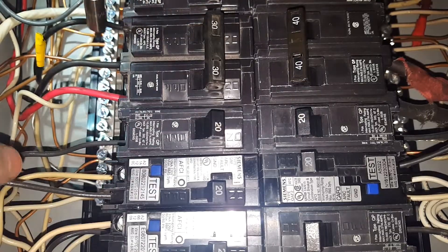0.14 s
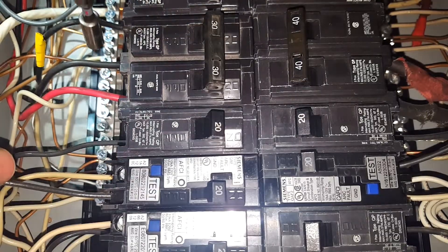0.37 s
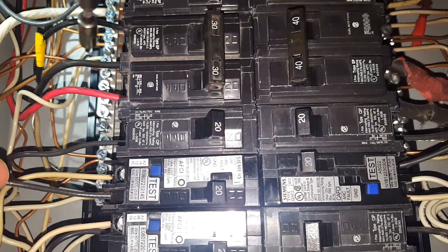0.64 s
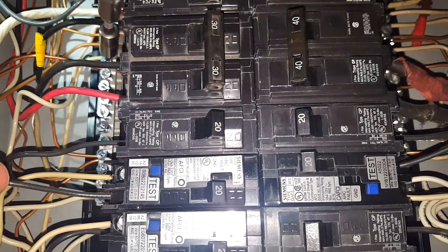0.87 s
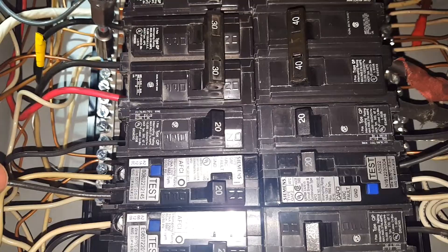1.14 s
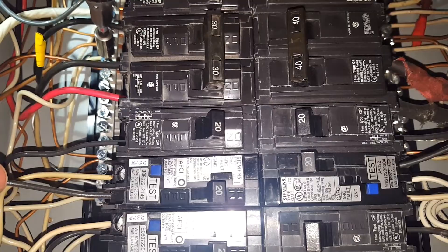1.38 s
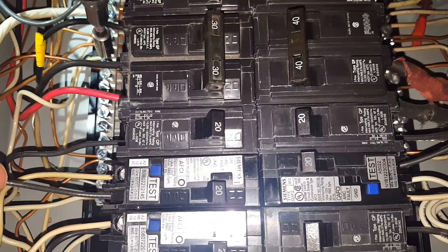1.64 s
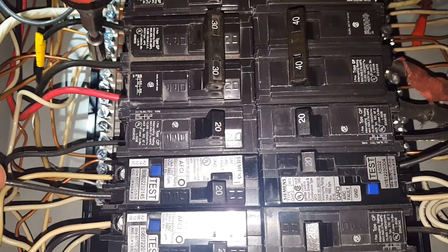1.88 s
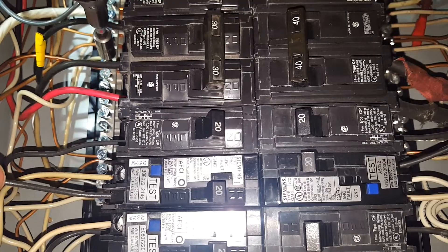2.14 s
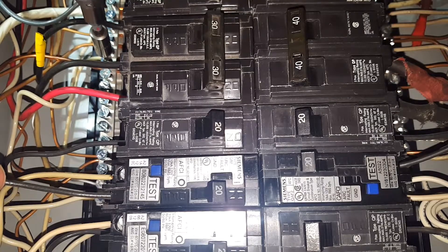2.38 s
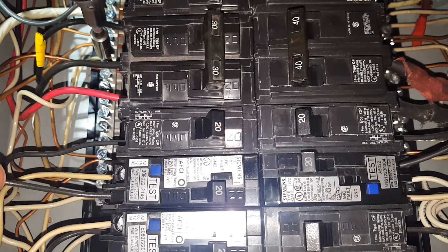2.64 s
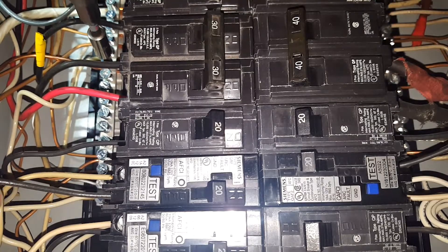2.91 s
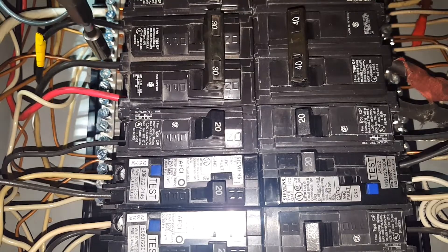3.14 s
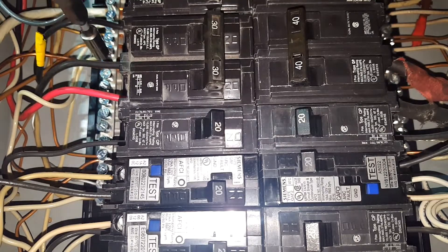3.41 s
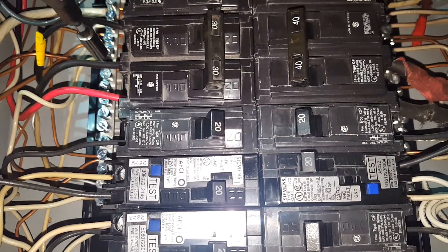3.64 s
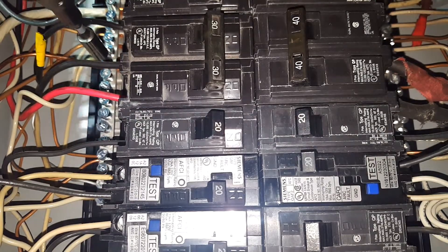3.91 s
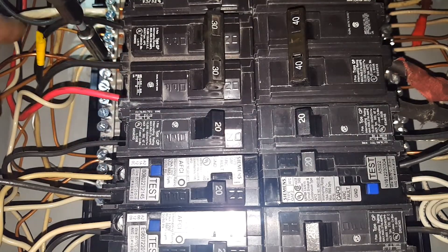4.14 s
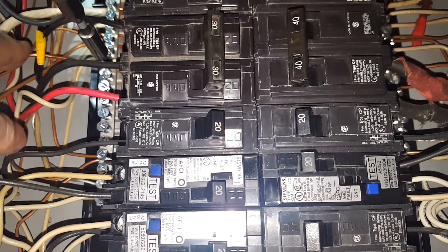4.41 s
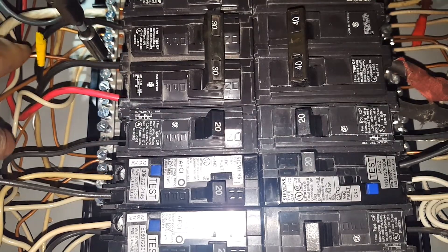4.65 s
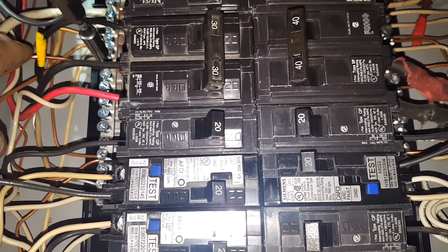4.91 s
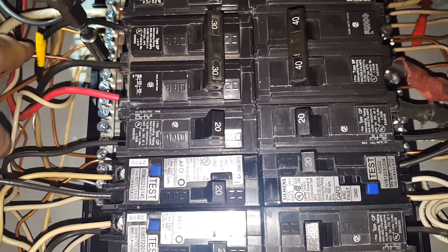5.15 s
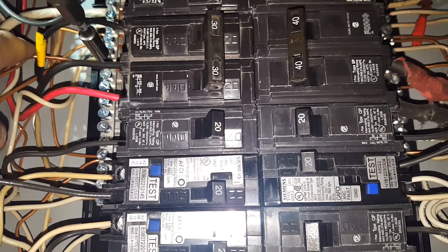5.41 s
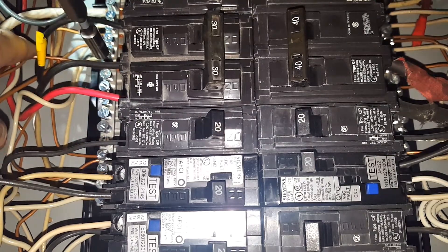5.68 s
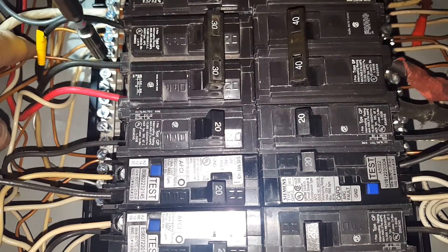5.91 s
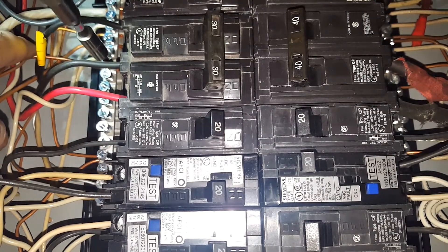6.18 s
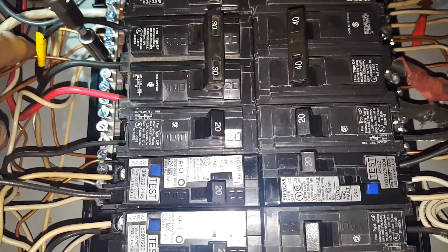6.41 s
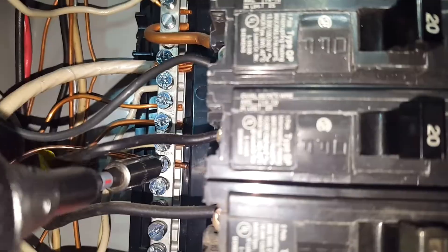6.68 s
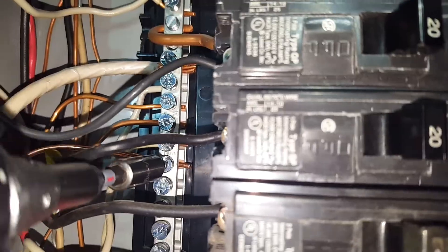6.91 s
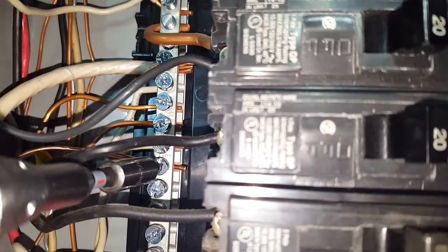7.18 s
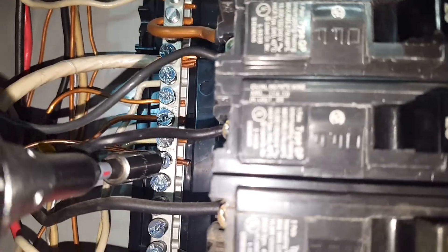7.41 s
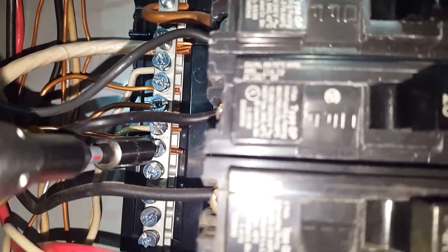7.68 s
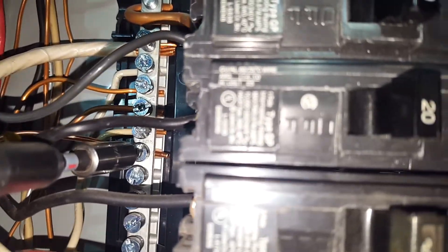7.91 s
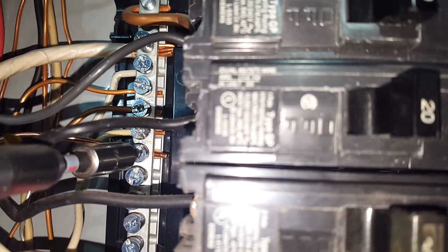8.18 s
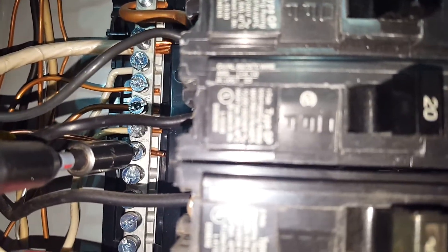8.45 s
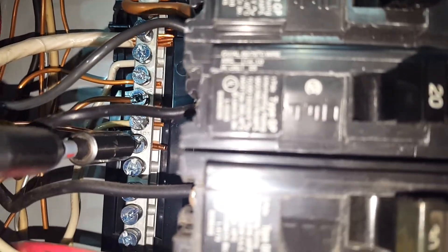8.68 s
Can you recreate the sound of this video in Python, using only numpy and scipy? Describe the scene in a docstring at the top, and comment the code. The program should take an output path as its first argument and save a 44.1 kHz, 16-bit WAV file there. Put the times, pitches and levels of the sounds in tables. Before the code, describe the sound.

A quiet indoor room with faint low hum and airy noise, heard very close by a hand-held phone. From 0 s a screwdriver rubs softly in a screw slot, with sparse dull taps from about 0.2 s that ring briefly in the steel box. Soft low bumps touch the left side around 1.0-1.2 s. Firmer knocks come near 2.0 and 2.5 s; low thumps cluster at 2.6-3.3 s, strongest near 3.1. Small hissing skids appear around 3.6 s. From 5 to 6.7 s taps, scrapes and thin slides crowd together irregularly, ending in a coarse scrape at 6.7. The work drops out for under a tenth of a second, then four fast, bright paired ratchet clicks snap at 6.85-6.95 s, left-heavy. A small tap follows near 7.1, a clear knock at 7.6, then faint rubbing and weak contacts near 8.6 over the quiet room.

```python
"""A screwdriver works the terminal screws of a steel electrical panel, close to a hand-held phone.
From the start a quiet room hums and the blade works: shaped noise whose rubbing follows the effort, while
skids, ticks and hiss strokes come at their own times. Soon the tip taps: noise bursts with box, bar and shaft modes.
From 1 s low thumps hit the left port only. Near 6.7 s the working sounds are muted for a moment; then a ratchet
clicks in pairs, each click opening with a snap. Light rubbing and a few sparse contacts remain over the room."""
import sys
import numpy as np
from scipy import signal
from scipy.fft import rfft, irfft, next_fast_len
from scipy.io import wavfile
from scipy.ndimage import uniform_filter1d, map_coordinates

SR = 44100
rng = np.random.default_rng(int(sys.argv[2]) if len(sys.argv) > 2 else 0)


def wrap_up_sound(samples):
    """Save the sound to the file named by the first command line argument, as 16-bit audio."""
    columns = np.atleast_2d(samples).T
    # keep every value between -1 and 1, then stretch to whole-number steps
    tamed = np.clip(columns, -1, 1)
    steps = np.round(tamed * 32767).astype(np.int16)
    wavfile.write(sys.argv[1], SR, steps)


def invert_db(level):
    """Linear amplitude ratio for a level in decibels (20 dB per decade), elementwise."""
    return 10 ** (np.asarray(level, dtype=float) / 20)


N = 388521


def unit(x):
    """Scaled to rms 1."""
    return x / np.sqrt(np.mean(x ** 2) + 1e-20)


def along(points, hz):
    """Interpolates (Hz, value) points on a log frequency axis."""
    point_hz, value = np.transpose(points)
    return np.interp(np.log(hz + 1), np.log(point_hz + 1), value, left=value[0], right=value[-1])


def wobble(knots_per_s):
    """A smooth random curve through normal draws."""
    knots = rng.standard_normal(int(N * knots_per_s / SR) + 4)
    return map_coordinates(knots, [np.arange(N) * knots_per_s / SR])


def swells(rows):
    """A bell-shaped gain for each (centre s, dB, half length s) row, summed."""
    t = np.arange(N) / SR
    return sum(invert_db(db) * np.exp(-((t - s) / half_s) ** 2) for s, db, half_s in rows)


# Default stereo spread. Each row: frequency in Hz, left-right likeness 0 to 1.
ALIKE = [(60, 0.35), (130, 0.93), (290, 0.3), (640, .15), (1400, 0.041), (15000, .01)]


def rush(spectrum, grit_db=0, alike=ALIKE):
    """Stereo noise of rms 1, by default most alike in the bass; random gain of grit_db makes it grainy."""
    size = next_fast_len(N)
    hz = np.fft.rfftfreq(size, 1 / SR)
    pair = rng.standard_normal((2, N)) * invert_db(grit_db * wobble(180))
    turn = np.arccos(np.clip(along(alike, hz), 0, 1)) / 2
    inside = (hz >= spectrum[0][0] / 2) & (hz <= spectrum[-1][0] * 2)
    shape = inside * invert_db(along(spectrum, hz)) * [np.cos(turn), np.sin(turn)]
    mid, side = irfft(rfft(pair, size) * shape, size)[:, :N]
    return unit(np.array([mid + side, mid - side]))


# Air noise of the room. Each row: frequency in Hz, relative density in dB per Hz.
ROOM = [(12, -36.5), (20, -5.5), (27, -15.5), (96, -6), (121, -11.5), (206, -12.5), (393, -25.5),
        (1140, -31.5), (1320, -29), (1430, -26.5), (9950, -41.5), (13900, -37.5), (16500, -37.5)]
# Steady tones in the room. Each row: frequency in Hz, level in dB before the port balance.
HUM = [(91.5, -84), (204.6, -81), (1362, -89)]


def room():
    """Faint shaped air noise and a few wavering tones, stronger at the left port."""
    t = np.arange(N) / SR
    tones = sum(invert_db(db + 3 + 1.5 * wobble(4.2)) * np.sin(2 * np.pi * hz * t) for hz, db in HUM)
    air = invert_db(-64.5 + 0.48 * wobble(19)) * rush(ROOM)
    return (air + tones) * invert_db([[1.4], [-1.4]])


def ticks(count, t60_s):
    """Envelope of tiny catches of the blade: random times, a few large among many small."""
    when, size = rng.random((2, count))
    spikes = np.bincount((when * N).astype(int), invert_db(-9 * np.log(1 - size) / 2), N)
    decay = invert_db(-60 * np.arange(SR // 10) / SR / t60_s)
    return signal.fftconvolve(spikes, decay)[:N]


# Turning under pressure. Each row: time in seconds, effort as box rumble in dB.
TURN = [(0.0, -60.5), (0.22, -64), (0.78, -66), (1.2, -72.5), (1.44, -62), (1.7, -59.5), (2.11, -57),
        (2.35, -70), (2.53, -53.5), (2.9, -54.5), (3.21, -49.5), (3.51, -60.5), (3.9, -48.5), (4.55, -58.5),
        (5.05, -49), (5.69, -51), (5.86, -46), (6.5, -51.5), (6.7, -44), (6.8, -51.5), (6.89, -59),
        (7.09, -56.5), (7.25, -79), (7.75, -73.5), (8.14, -76.5), (8.81, -73.5)]
# Strokes of the blade sliding on steel. Each row: centre in seconds, hiss level in dB, half length in seconds.
SLIDE = [(0.2, -73, 0.074), (0.68, -73, 0.063), (1.93, -70, 0.0075), (1.99, -64, 0.046),
         (2.485, -63, 0.012), (2.58, -84, 0.029), (2.82, -85, 0.03), (3.25, -67, 0.18), (3.54, -65, 0.032),
         (3.62, -62, 0.038), (3.7, -56, 0.024), (3.93, -64, 0.042), (4.13, -63, 0.02), (4.3, -63.5, 0.029),
         (4.88, -70, 0.019), (5.07, -66.5, 0.062), (5.19, -62, 0.03), (5.39, -64.5, 0.078),
         (5.58, -66.5, 0.058), (5.74, -60, 0.049), (5.89, -64, 0.042), (6.02, -60, 0.078),
         (6.24, -59.5, 0.028), (6.325, -48, 0.0063), (6.41, -57, 0.038), (6.57, -50, 0.011),
         (6.685, -54, 0.032), (6.81, -55, 0.025), (6.865, -51, 0.014), (6.93, -51.5, 0.013),
         (6.975, -55, 0.045)]
# Spectra of the rubbing. Each row: frequency in Hz, relative density in dB per Hz.
RUMBLE = [(80, -35.5), (160, -1.5), (290, 1.5), (400, -3.5), (510, 1.5), (690, -8.5), (835, -4.5),
          (1000, -5), (1600, -11.5), (2500, -43)]
SCRAPE = [(500, -20), (900, -3), (1300, -3), (1800, -3), (3000, -9), (4500, -13), (7000, -30)]
HISS = [(3000, -19), (5000, 0), (8500, 0.5), (10500, -8), (13500, 1), (16000, -15.5)]
# A contact reaches both ports. Each row: frequency in Hz, left-right likeness 0 to 1.
NEAR = [(100, 0.67), (300, .9), (1000, 0.6), (4000, 0.73), (15000, 0.11)]


def turning():
    """The blade rubs in the slot: with effort the box rumbles, the steel scrapes and hisses; strokes add hiss."""
    time_s, effort = np.transpose(TURN)
    effort_db = np.interp(np.arange(N) / SR, time_s, effort)
    scrape_db = effort_db - 14
    slips, left = wobble(22), np.array([[1], [-1]])
    rumble = invert_db(effort_db + 3.1 * slips + 3.2 * left) * rush(RUMBLE, grit_db=1.5)
    # the blade only catches when it is pressed hard
    pressed = np.clip((scrape_db + 69) / 9, 0, 1)
    grain = 1 + 0.4 * pressed * ticks(count=600, t60_s=0.02)
    scrape = invert_db(scrape_db + 1.1 * slips + 1.1 * left) * grain * rush(SCRAPE, grit_db=3.0, alike=NEAR)
    # steady hiss grows 0.55 dB per dB of effort
    sliding = invert_db(-73.5 + 0.55 * (effort_db + 52.5)) + swells(SLIDE)
    hiss = sliding * invert_db(1.2 * slips + 2.4 * left) * rush(HISS, grit_db=3.0)
    return rumble + scrape + hiss


# Short skids and tiny broad ticks of the blade.
# Each row: centre in seconds, level in dB, pitch in Hz, resonance half width in Hz, half length in seconds.
SKIDS = [(0.176, -72, 8300, 1820, 0.072), (.67, -70, 4230, 700, 0.11), (3.149, -63.5, 6200, 2500, 0.078),
         (3.531, -49, 8100, 1800, 0.014), (3.607, -44.5, 8500, 1180, 0.0085),
         (6.692, -30.5, 1340, 880, 0.038), (7.008, -54, 12000, 3970, 0.0018),
         (7.042, -51.5, 9050, 5000, 0.0017), (7.151, -69.5, 4490, 2500, .002),
         (2.536, -56, 4940, 1800, .003), (6.789, -45, 7000, 7000, 0.0018), (6.826, -52, 7500, 2500, 0.0018),
         (5.463, -70, 4400, 60, 0.021)]


def skids_and_ticks():
    """Each skid or tick is a swell of noise in one resonance, narrow or broad, stronger at the left port."""
    half = SR // 8
    t, f = np.arange(-half, half) / SR, np.fft.rfftfreq(half * 2, 1 / SR)
    out = np.zeros((2, N))
    for s, db, hz, width_hz, half_s in SKIDS:
        resonance = 1 / (1 + ((f - hz) / width_hz) ** 2)
        noise = unit(irfft(rfft(rng.standard_normal((2, len(t)))) * resonance))
        swell = np.exp(-(t / half_s) ** 2)
        out[:, round(s * SR) - half:][:, :len(t)] += invert_db(db + np.array([[3], [-3]])) * swell * noise
    return out


# Contact noise. Each row: band centre in Hz, level in dB, t60 in seconds at length factor 1.
BANDS = [(147, -4, 0.58), (256.8, 3, 0.33), (487, 1, 0.27), (1015, -7.5, 0.16), (1990, -3.5, 0.11),
         (3130, -10.5, 0.11), (4440, -1, 0.05), (7500, -2.5, 0.016), (12000, -8, 0.048)]
# Modes of the box and of the terminal bar. Each row: frequency in Hz, level in dB, t60 in seconds at length factor 1.
BOX = [(162, -4.5, 0.42), (266.4, -2, 0.1985), (498.2, 1, 0.25), (632, -5.5, 0.25), (836.6, -8, 0.2),
       (1153, -10.5, 0.096), (1534, -11.5, 0.056), (1945, -12.5, .06)]
BAR = [(2750, -12, .04), (3470, -14, .035), (4700, -14, .03), (5800, -14, .025), (8850, -17, .02)]
# The tool's shaft. Each row: multiple of its pitch, level in dB, t60 in seconds at length factor 1.
SHAFT = [(1.001, -8.5, 0.0704), (1.9, -6, .045), (2.76, -24.5, 0.03)]
# Answer of the small room. Each row: frequency in Hz, t60 in seconds.
ECHO = [(300, .35), (2000, 0.086), (10000, 0.088)]
LAG_SAMPLES = 28  # the treble of a contact reaches the right port this much later


def contacts(table, attack_s, crack_db, crack_t60_s, crack_cycles, ring_db, air_db, left_db, shade_db):
    """Each contact: a crack, noise dying band by band, and the box, bar and shaft modes ringing."""
    hz, level, t60_s = np.transpose(BANDS)
    noise = np.array([rush([(f / 2, -30), (f / 1.333, 0), (f * 1.254, 0), (f * 2, -30)], alike=NEAR) for f in hz])
    noise[hz > 1500, 1] = np.roll(noise[hz > 1500, 1], LAG_SAMPLES, axis=-1)
    noise = np.pad(noise, ((0, 0), (0, 0), (0, SR)))
    out, t = np.zeros((2, N + SR)), np.arange(SR // 4) / SR

    def side(f):
        """The phone's body shades the right port, more so in the treble."""
        return invert_db(np.multiply.outer([0.5, -0.5], left_db + shade_db * f / 10000))

    for s, db, knock_db, bright_db, pitch_hz, length in table:
        def tilt(f):
            """Tone of the contact in dB: the place struck favours the partials near its own pitch."""
            tone = [(450, knock_db), (800, 0.0036), (3000, 0), (5000, bright_db), (8000, bright_db),
                    (12000, bright_db + air_db)]
            return along(tone, f) + 7 * np.exp(-(np.log(f / pitch_hz) / 0.51) ** 2)

        modes = BOX + BAR + [(pitch_hz * ratio, shaft_db, shaft_t60) for ratio, shaft_db, shaft_t60 in SHAFT]
        mode_hz, mode_db, mode_t60_s = np.transpose(modes)[..., None]
        at = slice(round(s * SR), round(s * SR) + len(t))
        slow = np.clip(length, 0.1, 3)
        # the bass swells more slowly than the treble
        rise = 1 - np.exp(-t / (attack_s * slow + 1.2 / hz[:, None]))
        body = invert_db(-60 * t / (t60_s[:, None] * slow))
        crack = invert_db(crack_db - 60 * t / ((crack_t60_s + crack_cycles / hz[:, None]) * slow))
        echo = invert_db(-22.5 - 60 * t / along(ECHO, hz)[:, None])
        envelope = invert_db(level + tilt(hz))[:, None] * rise * (body + crack + echo)
        sound = np.einsum("cb,bt,bct->ct", side(hz), envelope, noise[:, :, at])
        # modes vary in level, pitch and phase from contact to contact
        draw = rng.standard_normal((3, 2, len(modes), 1))
        mode_level = ring_db + mode_db + tilt(mode_hz) + 1.9 * draw[0]
        strength = side(mode_hz) * invert_db(mode_level - 60 * t / (mode_t60_s * slow))
        phase = 3 * draw[1, 1] + 0.56 * draw[2]
        swing = np.sin(2 * np.pi * mode_hz * (1 + 0.025 * draw[1, 0]) * t + phase)
        sound += (strength * swing).sum(1) * (1 - np.exp(-t / 0.0012))
        out[:, at] += invert_db(db) * sound
    return out[:, :N]


# Tip contacts, before the common trim.
# Each row: start in seconds, level in dB, box knock in dB, brightness in dB, ring length factor.
TAPS = [(0.237, -51, -8.5, 7.5, 1.4), (0.416, -30.5, -5, -22.5, 1.12), (0.72, -38.5, -12, -19, 1.5),
        (0.787, -45, -3, -34, 1.26), (0.92, -50.5, 8.5, -38, 0.72), (1.111, -30.5, -6, -31, 0.86),
        (1.394, -37, -6.5, -55, 0.81), (1.435, -32.5, -3.5, -42, 1.08), (1.633, -45.5, -4, -65, 2.8),
        (1.755, -45, -8, -41, 0.67), (1.866, -51, -9, -1, 0.91), (1.92, -31.5, -14, -3.5, 2.44),
        (1.975, -19.5, -8.5, -10, 0.56), (1.999, -40, -5, 4, 3.4), (2.091, -38, -11.5, -4, 1.07),
        (2.274, -28.5, -3.5, -5, 1.09), (2.455, -37, 2, -26, 1.2), (2.475, -21, -6.5, -5.5, 0.91),
        (2.58, -34.5, -12.5, 1.5, 1.04), (2.71, -41.5, -19, -40, 1.3), (2.775, -36, -12.5, -12.5, 0.8),
        (2.811, -23, -6, -24, 0.8), (3.04, -36, -12.5, -18.5, 2.3), (3.069, -45, 9.5, -0.5, 1.1),
        (3.276, -35.5, 9.5, -34, 0.7), (3.304, -35.5, -8, -16, 1.3), (3.481, -27, -2, -71, 0.83),
        (3.542, -35, -33.5, -33, 1.7), (3.607, -43, -6, -15, 2.7), (3.656, -42, -20, -13, 1.3),
        (3.689, -31.5, -16.5, -17, 0.59), (3.697, -32.5, -23, -20, 1.03), (3.824, -36.5, -4.5, -38, 0.89),
        (3.839, -41.5, -31, -16, 1.8), (3.934, -42, -14, -37, 1.9), (3.973, -42.5, -11, -47, 1.3),
        (4.112, -49.5, -25, 7.5, 1.4), (4.138, -33.5, -17.5, -74, 1.1), (4.274, -42.5, -8.5, -17, 3),
        (4.491, -50, -31, -2, 0.97), (4.551, -42, -0.5, -13, 0.5), (4.643, -50.5, -16, 0, 1.5),
        (4.761, -37.5, -35, -33, 1), (4.858, -42.5, 1, -48, 1.13), (4.955, -37.5, -19.5, -35, 1.16),
        (4.984, -38.5, -5.5, -17, 3.2), (5.069, -33.5, -19, -15, 0.93), (5.08, -31.5, -7, -19, 0.56),
        (5.247, -33, -12, -13, 1.3), (5.299, -33, -24, -14, 0.81), (5.349, -30.5, -12, -7.5, 2.3),
        (5.379, -36.5, -15, -31, 1.4), (5.417, -35.5, -20.5, -21, 2), (5.442, -36.5, -18.5, -32, 1.9),
        (5.622, -33, -35, -6.5, 0.99), (5.678, -25.5, -10, 0.5, 1.12), (5.737, -27, -19.5, -37, 1.27),
        (5.851, -43.5, -3, -10, 2.3), (5.946, -38, -20.5, -22, 5.7), (5.996, -21, -21, -14.5, 0.59),
        (6.011, -34.5, -8, -21, 3.8), (6.058, -38.5, -17.5, -34, 3.4), (6.201, -33, -23, -16, 1.5),
        (6.225, -35.5, -17.5, -39, 2), (6.324, -27.5, -16, 1, 1.07), (6.422, -38, -22, -26, 2.7),
        (6.527, -31.5, -5.5, -44, 1.36), (6.558, -26.5, -25.5, -51, 0.95), (6.597, -30.5, -26, -17, 0.8),
        (6.645, -31.5, -21, -2, 1.4), (6.677, -21, -14.5, -4, 1.8), (6.794, -44.5, -19.5, -25, 2.2),
        (6.812, -30, -15, -8.5, 1.1), (7.071, -28.5, -19, -19, 0.67), (7.112, -52, -5, -19.5, 1.6),
        (7.615, -21, -14.5, -7.5, 0.89), (7.759, -70, 12.5, -19, 1.02), (8.086, -66.5, 6, -12.5, 0.92),
        (8.597, -43, -3, -40, 0.88), (8.648, -49, -4, -37.5, 1.4)]


def taps():
    """The tip strikes the slots; the shaft's pitch sits lower the more a tap goes into the box."""
    tip = [(s, db, knock_db, bright_db, 880 - 12.5 * knock_db, length)
           for s, db, knock_db, bright_db, length in TAPS]
    return invert_db(-15) * contacts(tip, attack_s=0.00023, crack_db=7, crack_t60_s=0.019, crack_cycles=24,
                               air_db=-12.5, ring_db=2.5, left_db=5.0, shade_db=3.5)


# Thumps, before a common gain. Each row: centre in seconds, level in dB, pitch in Hz, length in cycles.
THUMPS = [(1.012, -37.5, 60.5, 2.1), (1.072, -32, 77.4, 0.67), (1.163, -31.5, 72, 0.84),
          (1.223, -38.5, 75, 1.5), (2.58, -40, 65, 1.6), (2.616, -43, 80, 1.8), (2.671, -26, 131, 3.2),
          (2.756, -34, 85, 3.1), (2.803, -27.5, 115, 4.2), (2.916, -26, 103, 1.9), (3.095, -22, 159, 4.5),
          (3.131, -8.5, 144, 1.08), (3.165, -32, 75, 2.2), (3.193, -26, 110, 0.79), (3.296, -38, 67, 3.1),
          (4.804, -30.5, 74, 1.5)]
# Low flutter. Each row: centre in seconds, level in dB before its wobble, half length in seconds.
FLUTTER = [(1.08, -47.5, 0.13), (2.67, -34, 0.074), (2.88, -37.5, 0.075), (3.13, -48, 0.26),
           (4.86, -49, 0.055)]


def thumps():
    """Short pushes of pressure on the left port, a few cycles long at most, in a low flutter."""
    out, t = np.zeros((2, N)), np.arange(-SR // 16, SR // 16) / SR
    for s, db, hz, cycles in THUMPS:
        phase = hz * t
        # the swing slows as it goes
        swing = np.cos(2 * np.pi * (phase - 0.12 * phase ** 2) + 1.74)
        push = -swing * np.exp(-(phase / (0.33 * cycles)) ** 2)
        push -= 0.53 * np.exp(-(phase / 0.13) ** 2)  # a narrow dip at the centre
        out[0, round(s * SR) + round(t[0] * SR):][:len(t)] += invert_db(db + 6.5) * push
    low = rush([(30, -9.0), (70, 4.5), (130, -10.5), (300, -18.5)])[0]
    out[0] += swells(FLUTTER) * invert_db(4.5 * wobble(25)) * low
    return out


# Ratchet pawl, a lift and a drop for each tooth. Each row: start in seconds, level in dB, pitch in Hz.
RATCHET = [(6.847, -18, 3615), (6.854, -15.5, 1160), (6.876, -22, 9600), (6.884, -15.5, 4800),
           (6.909, -23, 8130), (6.917, -14, 4750), (6.9424, -18.5, 7550), (6.9528, -13.5, 3505)]


def snaps():
    """Each pawl contact opens with a snap of a few cycles, louder and earlier at the left port."""
    snap_db, snap_hz, snap_t60_s = 8, 3200, 0.001
    out, t = np.zeros((2, N)), np.arange(SR // 100) / SR
    pulse = np.cos(2 * np.pi * snap_hz * t) * invert_db(-60 * t / snap_t60_s)
    for s, db, _ in RATCHET:
        out[0, round(s * SR):][:len(t)] += invert_db(db + snap_db) * pulse
        out[1, round(s * SR) + LAG_SAMPLES:][:len(t)] += invert_db(db + snap_db - 9.5) * pulse
    return out


def ratchet():
    """The pawl strikes twice a tooth: short bright contacts, trimmed, plus untrimmed snaps."""
    knock_db, bright_db, length = -24, -3.5, 0.51
    teeth = [(s, db, knock_db, bright_db, hz, length) for s, db, hz in RATCHET]
    pawl = contacts(teeth, attack_s=0.000079, crack_db=12.5, crack_t60_s=0.01, crack_cycles=3.7,
                    air_db=7, ring_db=-7.5, left_db=8.5, shade_db=8)
    return invert_db(-15) * pawl + snaps()


# Brief mute of the working sounds: start in seconds, end in seconds.
CUT = (6.718, 6.787)


def scene():
    """Work sounds, silenced at the mute, over the thumps and the room."""
    t = np.arange(N) / SR
    heard = uniform_filter1d(((t < CUT[0]) | (t > CUT[1])) * 1.0, size=60)
    work = turning() + skids_and_ticks() + taps() + ratchet()
    return room() + work * heard + thumps()


def band_limit(x):
    """A steep low-pass at the top of the band."""
    return signal.sosfilt(signal.butter(12, 17020, fs=SR, output="sos"), x)


# Band limit of the phone. Each row: frequency in Hz, gain in dB.
TOP = [(15500, -1.5), (15900, -13), (16700, -20.5), (17000, -71.5)]


def record(dry):
    """The phone's band limit takes off the top treble."""
    gain = invert_db(along(TOP, np.fft.rfftfreq(N, 1 / SR)))
    limited = irfft(rfft(dry) * gain, N)
    return band_limit(limited)


dry = scene()
out = record(dry)
wrap_up_sound(out)
```